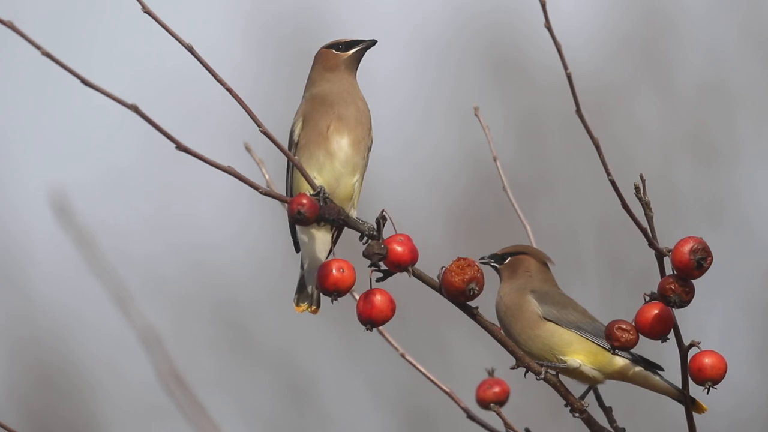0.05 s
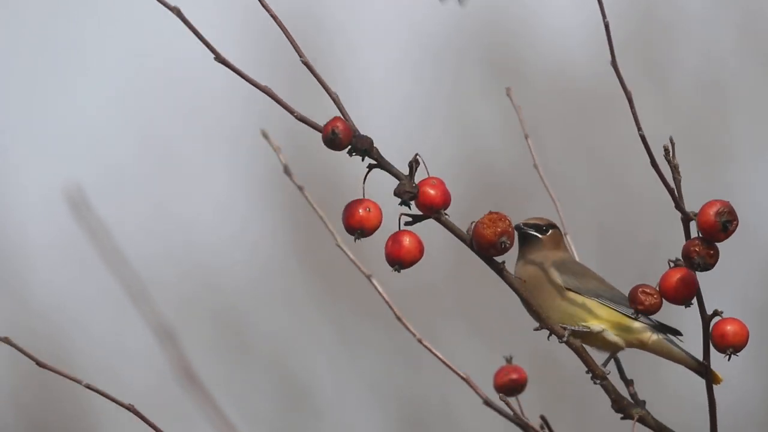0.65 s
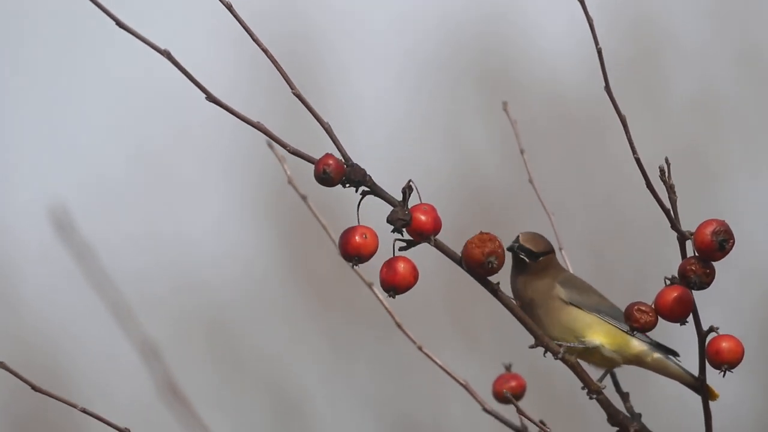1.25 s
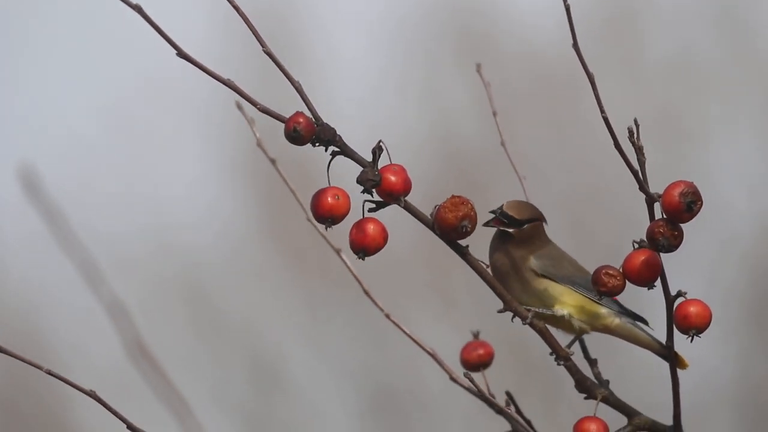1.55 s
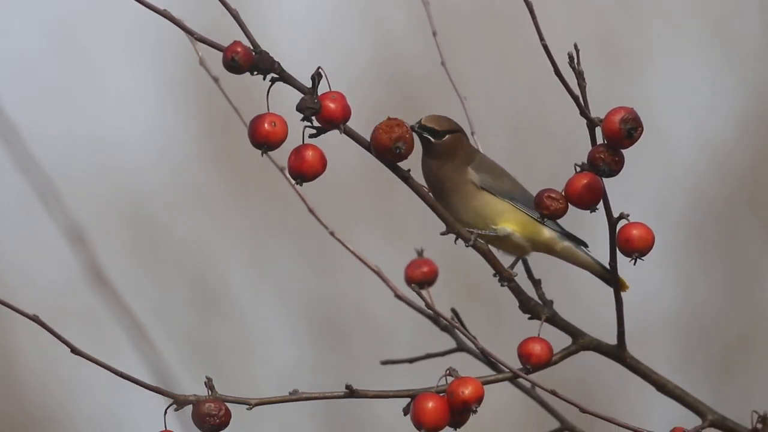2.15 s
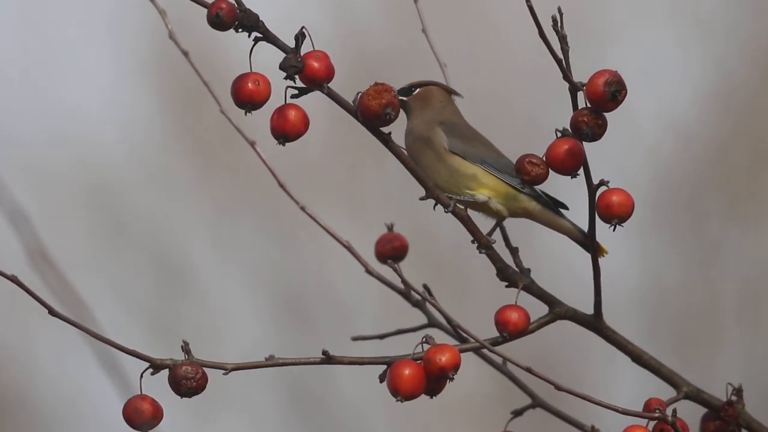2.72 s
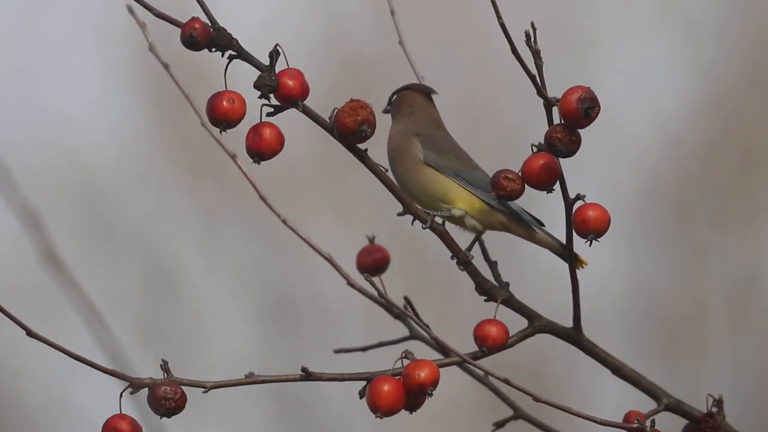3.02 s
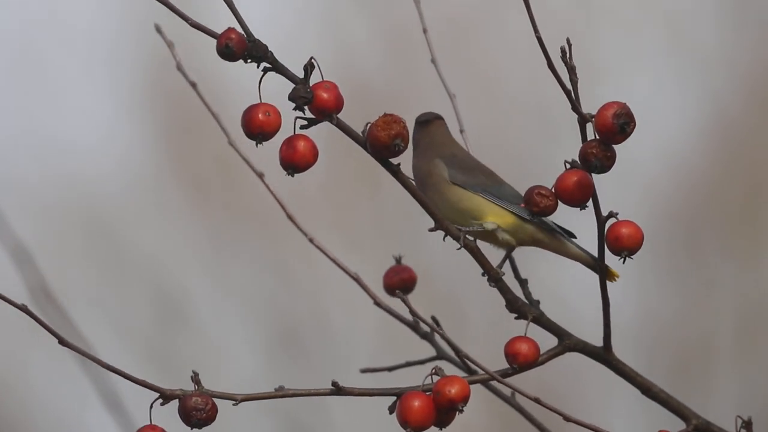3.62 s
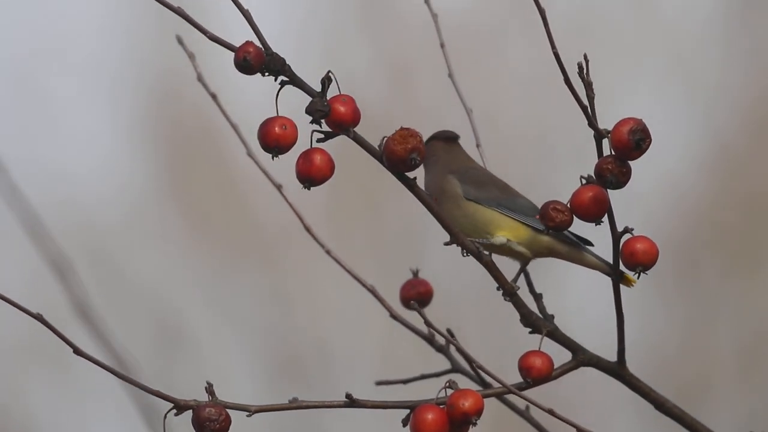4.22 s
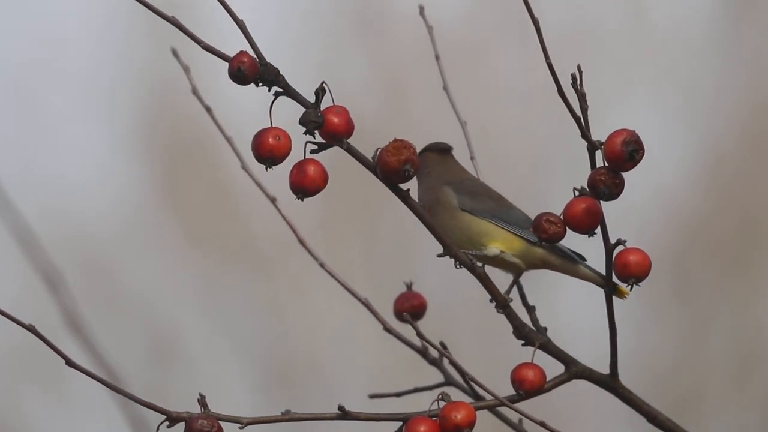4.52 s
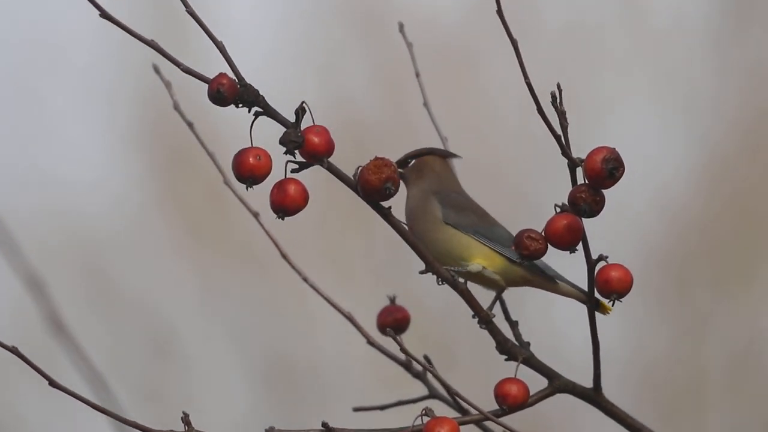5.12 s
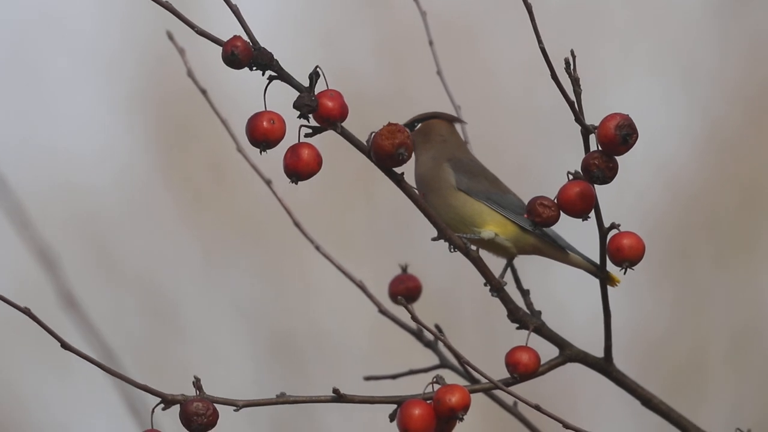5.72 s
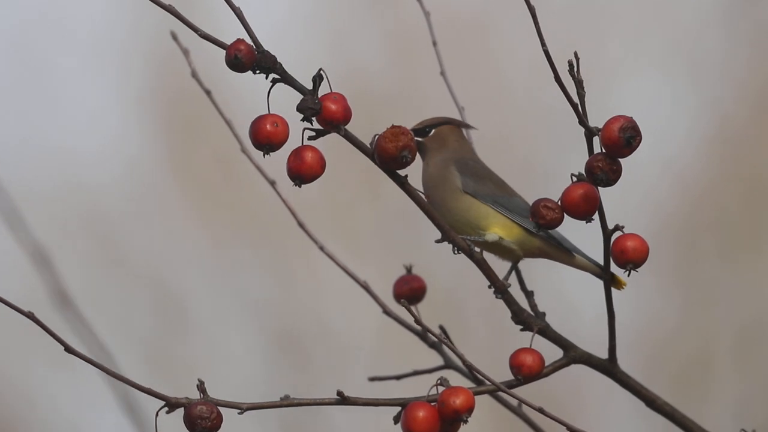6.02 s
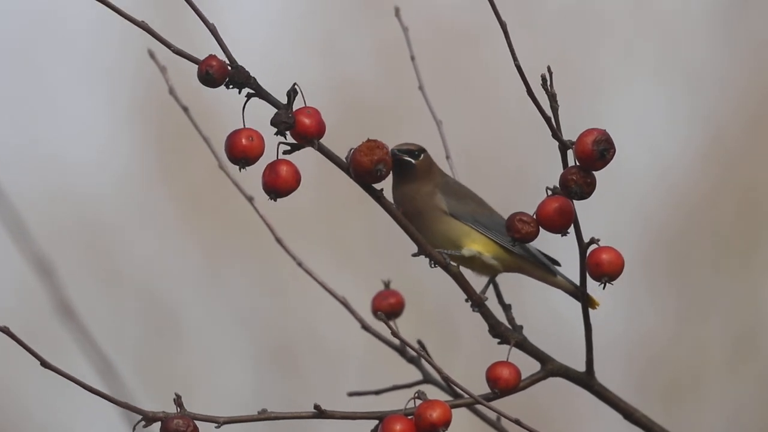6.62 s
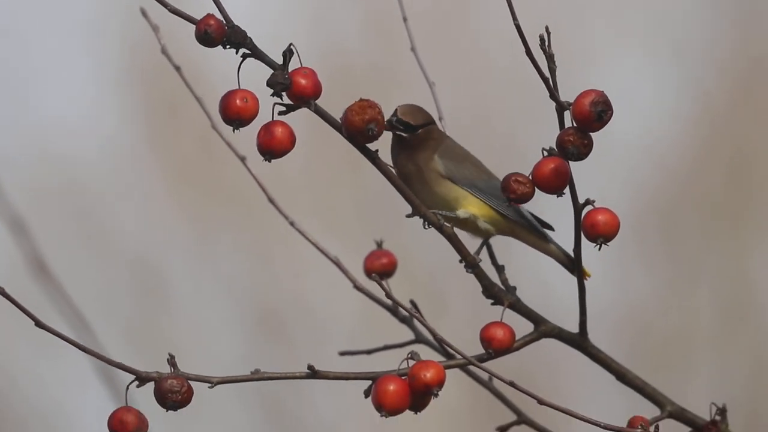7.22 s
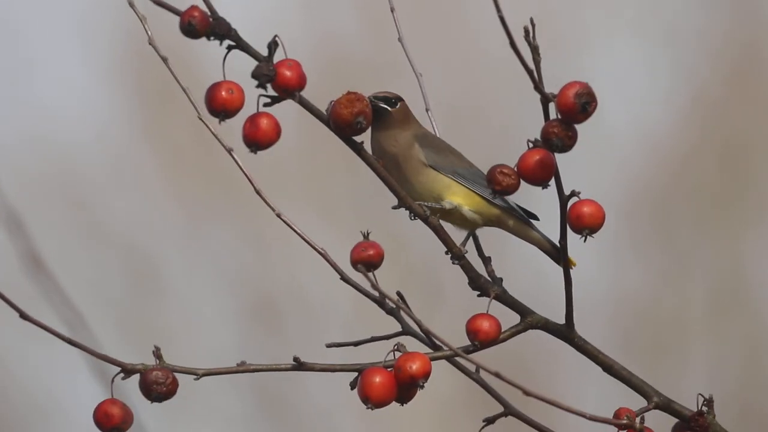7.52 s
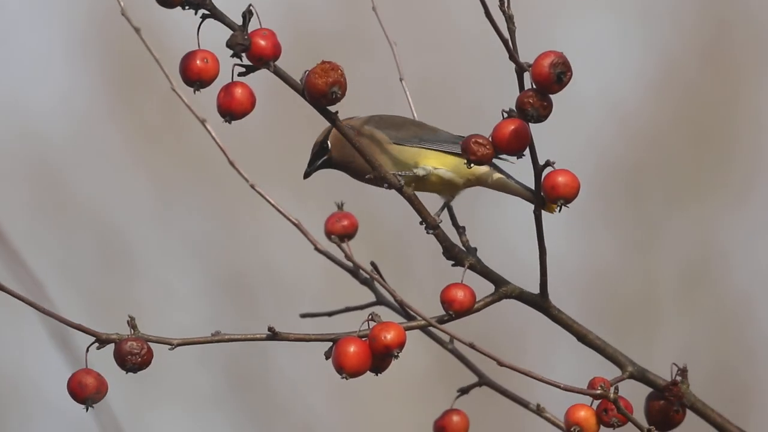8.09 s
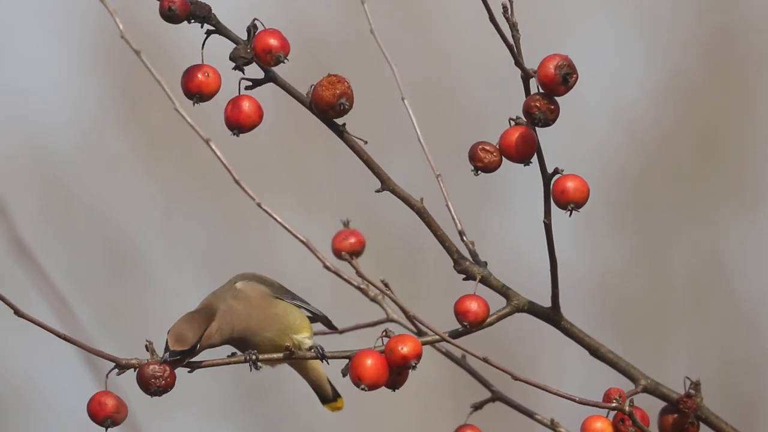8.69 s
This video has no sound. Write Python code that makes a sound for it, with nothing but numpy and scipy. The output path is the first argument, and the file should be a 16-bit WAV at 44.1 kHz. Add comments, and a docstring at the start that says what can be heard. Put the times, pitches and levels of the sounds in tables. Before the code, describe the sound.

A quiet, steady rumble of distant traffic with a faint hiss runs throughout. At about 0.3 seconds a small bird nearby gives a thin, very high whistle and a rapid trill, then another whistle at 0.8. A chip and a quick twitter come at 1.6, fainter paired rising notes from farther away between 1.9 and 2.6, and another twitter at 2.7. From about 4 to 6 seconds light puffs of wind make low, soft bumps on the microphone. Water drops spatter on it from 5.6, and one strikes its housing at 6 with a sharp click, the loudest sound of all. Another strong click comes at 7, followed by a light patter of ticks until 7.6, a small spatter at 7.8 and a further click near 8. Faint high twitters return from 8.3 to the end, with one more soft wind bump.

```python
"""A steady rumble of distant traffic, and almost at once the thin whistles and trills of waxwings.
The birds call from a bare fruit tree, each note a near sine from the syrinx, scattered by the twigs.
Light puffs of wind bump the single microphone. In the second half a few drops spatter
and tick on its housing, making it ring."""
import sys
import numpy as np
from scipy import signal
from scipy.fft import rfft, irfft
from scipy.io import wavfile
from scipy.ndimage import uniform_filter1d

SR = 44100
rng = np.random.default_rng(int(sys.argv[2]) if len(sys.argv) > 2 else 0)


def to_wav(sig):
    """Store sig (one row per channel, or 1-D mono) as 16-bit WAV at the path in sys.argv[1].

    Samples outside -1..1 are clipped; the rate is SR.
    """
    pcm = np.clip(np.atleast_2d(sig), -1, 1) * 32767
    pcm = np.round(pcm).astype(np.int16)
    wavfile.write(sys.argv[1], SR, pcm.T)  # frames by channels


N = 385875
TIME = np.arange(N) / SR


def undb(db):
    """Decibels to gain."""
    return 10 ** (np.asarray(db) / 20)


def unit(x):
    """Scale to rms 1."""
    return x / np.sqrt(np.mean(x ** 2))


def add(out, start_s, x):
    """Mix x into out from the given time."""
    i = max(int(start_s * SR), 0)
    out[i:i + len(x)] += x[:max(len(out) - i, 0)]


def fade(t, t60):
    """Exponential decay, 60 dB down after t60 seconds."""
    return np.exp(-np.log(1000) * t / t60)


def colour(points, hz):
    """Gain at hz of a spectrum given as (frequency [Hz], level [dB])."""
    point_hz, db = np.transpose(points)
    return undb(np.interp(np.log(hz + 1e-9), np.log(point_hz), db))


def noise(points, size):
    """Noise of rms 1 with a given spectrum."""
    white = rfft(rng.standard_normal(size))
    return unit(irfft(white * colour(points, np.fft.rfftfreq(size, 1 / SR)), size))


def wander(rate_hz, size=N):
    """Smooth random drift of rms 1."""
    hold = max(int(SR / rate_hz), 1)
    steps = np.repeat(rng.standard_normal(size // hold + 1), hold)
    return unit(uniform_filter1d(uniform_filter1d(steps, hold), hold)[:size])


# The open air around the tree: (frequency [Hz], level [dB])
AIR_SPECTRUM = [(12, -41), (20, -20), (60, -3), (222, -1), (328, -2), (367, -0.5), (499, -3.5), (542, -3.5),
                (802, -4.5), (923, -3), (2750, -16.5), (5230, -24.5), (8410, -23), (14700, -33),
                (16000, -31)]
# Resonances in the traffic drone: (frequency [Hz], width [Hz], boost [dB])
TRAFFIC_DRONES = [(247, 71, 2), (410, 97, 0), (924, 48, 1.5)]
# The background's slow rise, before the trims: (time [s], traffic level [dB], hiss level [dB])
BACKGROUND_LEVELS = [(0.0, -49.5, -61), (0.41, -49.5, -60.5), (8.75, -47.5, -58.5)]

def distant_traffic(traffic_trim_db=-.5, hiss_trim_db=-1, bass_drift_db=2):
    """Traffic from far off: broad drones and a restless bass, under a smooth high hiss."""
    hz = np.fft.rfftfreq(N, 1 / SR)
    drone_db = sum(db * np.exp(-((hz - centre) / width * 2) ** 2) for centre, width, db in TRAFFIC_DRONES)
    spectrum = rfft(noise(AIR_SPECTRUM, N)) * undb(drone_db)
    bands_hz = [(0, 150), (150, 3500), (3500, SR)]
    bass, body, hiss = (irfft(spectrum * ((hz >= low) & (hz < high)), N) for low, high in bands_hz)
    times, *levels = np.transpose(BACKGROUND_LEVELS)
    traffic_db, hiss_db = (np.interp(TIME, times, db) for db in levels)
    traffic = (body * undb(.2 * wander(8.6)) + bass * undb(bass_drift_db * wander(9) - 1)) / body.std()
    return traffic * undb(traffic_db + traffic_trim_db) + unit(hiss) * undb(hiss_db + hiss_trim_db)


# Single vehicles in the distance: (time [s], length [s], frequency [Hz], width [Hz], level [dB])
VEHICLES = [(.35, 1.2, 800, 450, -61), (1.05, 0.65, 540, 40, -63), (1.851, 0.83, 247.3, 35, -56),
            (4.5, 0.36, 189.7, 35, -56), (7.1, .8, 255, 35, -60)]

def far_vehicles():
    """Each is a wavering hum or rush that rises out of the rumble and sinks back."""
    out = np.zeros(N)
    for start, length, hz, width_hz, db in VEHICLES:
        size = int(length * SR)
        waver = wander(width_hz * 2, size) + 1j * wander(width_hz * 2, size)
        hum = np.real(waver * np.exp(2j * np.pi * hz * TIME[:size]))
        add(out, start, undb(db) * np.hanning(size) * hum)
    return out


# Wind across the microphone: (time [s], length [s], level [dB])
WIND_GUSTS = [(1.2, .14, -55), (2.53, .2, -58), (3.92, 0.11, -47.5), (4.13, .32, -46), (5.4, .7, -59)]
# Its buffeting: (frequency [Hz], level [dB])
BUFFET_SPECTRUM = [(15, -15), (40, -3), (85, 1), (140, -7), (250, -25), (800, -60)]

def wind_gusts():
    """Low turbulence that swells and sinks as a gust crosses the microphone."""
    out = np.zeros(N)
    for start, length, db in WIND_GUSTS:
        size = int(length * SR)
        add(out, start, undb(db) * np.hanning(size) * noise(BUFFET_SPECTRUM, size))
    return out


# Puffs right on the diaphragm: (time [s], level [dB], frequency [Hz])
WIND_BUMPS = [(3.998, -31, 91), (4.248, -33.5, 65), (5.032, -36.5, 85), (5.741, -41, 62), (5.83, -41, 70),
              (5.902, -42, 65.3), (8.53, -40, 123)]

def wind_bumps(rise_cycles=.38, size=4096):
    """Each puff pushes the diaphragm through a swing or two."""
    t, out = TIME[:size], np.zeros(N)
    for start, db, hz in WIND_BUMPS:
        rise = t * hz / rise_cycles
        envelope = rise * np.exp(1 - rise)
        add(out, start, undb(db) * envelope * np.sin(2 * np.pi * hz * t))
    return out


# Drops bursting on the microphone: (time [s], level [dB], t60 [s], splat relative to spray [dB])
BURSTING_DROPS = [(5.616, -49.5, 0.095, -11), (5.786, -40.5, 0.08, 4.5), (5.853, -49, 0.077, -4),
                  (7.785, -49, .06, -10), (7.801, -46, 0.052, -6)]
# Their fine spray: (frequency [Hz], level [dB])
SPRAY_SPECTRUM = [(1000, -33), (4000, -7), (7500, 5.5), (10500, -0.5), (14000, -7), (17000, -36)]
# Their dull splat: (frequency [Hz], level [dB])
SPLAT_SPECTRUM = [(600, -30), (1500, -4), (2600, -7), (3500, 0.5), (5000, -14), (16000, -35)]

def drop_spatters(rise_s=.0003, size=4096):
    """A drop bursts in a splat and a fizz of spray, gone within a tenth of a second."""
    t, out = TIME[:size], np.zeros(N)
    for start, db, t60, splat_db in BURSTING_DROPS:
        burst = noise(SPRAY_SPECTRUM, size) + undb(splat_db) * noise(SPLAT_SPECTRUM, size)
        add(out, start, undb(db) * burst * fade(t, t60) * (1 - np.exp(-t / rise_s)))
    return out


# A drop's contact with the housing: (frequency [Hz], level [dB])
CONTACT_SPECTRUM = [(200, -41), (700, -11), (1300, 1.5), (2100, -5), (3500, 2), (4700, -2), (6000, -0.5),
                    (7700, 2), (10000, -7), (12500, -21), (14300, -19), (17000, -25)]

def contact_crack(size):
    """The impact itself: a very short minimum-phase pulse, its energy packed at the start."""
    cepstrum = irfft(np.log(colour(CONTACT_SPECTRUM, np.fft.rfftfreq(size, 1 / SR))))
    lag = np.arange(size)
    causal = (lag > 0) & (lag < size // 2)
    crack = irfft(np.exp(rfft(2 * cepstrum * causal)))
    return crack / np.abs(crack).max()


# Modes of the microphone housing: (frequency [Hz], level [dB], t60 [s])
HOUSING_MODES = [(1830, -2, 0.011), (2120, -10, 0.012), (2580, -5, 0.0099), (3240, -12, 0.011),
                 (3600, -6, 0.011), (4150, -9, .012), (6540, -22, .005), (7500, 15, 0.0045),
                 (9100, -5, .006), (10150, 10.5, 0.0048), (11500, -1, 0.0026), (14550, -15, .003)]

def housing_ring(size):
    """The struck housing rings for a few milliseconds."""
    t = TIME[:size]
    ring = sum(undb(db) * fade(t, t60) * np.sin(2 * np.pi * hz * t) for hz, db, t60 in HOUSING_MODES)
    return ring / np.abs(ring).max()


# Drops on the housing: (time [s], level [dB], ring share [0-1], cut-off [Hz], relative graze [dB])
TICKING_DROPS = [(5.9869, 0.3, .98, 15500, -11), (6.0044, -22.5, .8, 3500, 3),
                 (6.9165, -34, .2, 14000, -30), (6.9261, -26, .6, 11000, -20),
                 (6.9949, -10.5, 0, 17000, -30), (7.2513, -36, .7, 12000, -20),
                 (7.4024, -24, .2, 13000, -10), (7.4220, -26.5, .6, 15000, -10),
                 (7.4333, -29, 0, 10000, -20), (7.4535, -24.5, 0.4, 14000, -22),
                 (7.4586, -20.5, .1, 12000, 4), (7.5004, -30, .2, 12000, -8),
                 (7.9499, -15.5, 0.16, 13000, -4)]

def drop_ticks(patter_start_s=6.88, patter_length_s=.75, patter_count=30, graze_lead_s=.0009, size=1024):
    """Each drop grazes the housing, then lands and rings it; soft ones wake only its low modes."""
    crack, ring = contact_crack(size), housing_ring(size)
    faint_patter = [(patter_start_s + patter_length_s * when, -46 + 10 * force ** 2, share, 16000, -15)
                    for when, force, share in rng.random((patter_count, 3))]
    out = np.zeros(N)
    for start, db, ring_share, cutoff_hz, graze_db in list(TICKING_DROPS) + faint_patter:
        softness = signal.butter(4, cutoff_hz, fs=SR, output="sos")
        tick = signal.sosfilt(softness, (1 - ring_share) * crack + ring_share * ring)
        tick = undb(db) * tick / np.abs(tick).max()
        add(out, start - graze_lead_s, undb(graze_db) * tick)
        add(out, start, tick)
    bass_cut = signal.butter(2, 850, "high", fs=SR, output="sos")  # so small a part gives no bass
    return signal.sosfilt(bass_cut, out)


def syrinx_note(length, start_hz, top_hz, end_hz, crest, bend, edge=.2, overtone_db=-28):
    """A near sine that climbs to its top pitch, reached at the share crest of its length, then drops."""
    progress = np.linspace(0, 1, int(length * SR))
    climb_left = np.maximum(1 - progress / crest, 0)
    drop = np.maximum((progress - crest) / (1 - crest), 0)
    hz = top_hz - (top_hz - start_hz) * climb_left ** bend - (top_hz - end_hz) * drop ** 2
    phase = 2 * np.pi * np.cumsum(hz) / SR
    ramp_share = min(edge, .0061 / length)  # opens and closes in at most 6.1 ms
    opening = np.minimum(np.minimum(progress, 1 - progress) / ramp_share, 1)
    return np.sin(np.pi / 2 * opening) * (np.sin(phase) + undb(overtone_db) * np.sin(2 * phase))


def twig_echoes(call, wet_db, t60, first_s, count, last_s=.23):
    """The direct call, followed by many faint echoes from the branches around the bird."""
    lags = rng.uniform(first_s, last_s, count)
    response = np.zeros(SR)
    response[(lags * SR).astype(int)] = rng.standard_normal(count) * fade(lags, t60)
    return call + undb(wet_db) * signal.fftconvolve(call, response / np.linalg.norm(response))[:N]


# Paired calls from deeper in the tree: (time [s], long top [Hz], short top [Hz], level [dB])
RISING_PAIRS = [(1.903, 9850, 8350, -62), (2.112, 8740, 8130, -55), (2.309, 8400, 7850, -55),
                (2.499, 7980, 7600, -53)]

def far_waxwing(start_share=.84, snap_hz=1700, short_delay_s=.083, crescendo_db=4, rasp_db=2.5, trim_db=1):
    """A long hooked sweep, then a short, straighter, louder one; each grows and snaps off downward."""
    def sweep(length, top_hz, crest, bend):
        note = syrinx_note(length, start_share * top_hz, top_hz, top_hz - snap_hz, crest, bend, edge=.12)
        return note * undb(crescendo_db * np.linspace(-.5, .5, len(note)))

    out = np.zeros(N)
    for start, long_hz, short_hz, db in RISING_PAIRS:
        add(out, start, undb(db) * sweep(.054, long_hz, crest=.84, bend=1.8))
        add(out, start + short_delay_s, undb(db + 4) * sweep(.034, short_hz, crest=.8, bend=1.15))
    calls = out * undb(trim_db + rasp_db * wander(400))
    return twig_echoes(calls, wet_db=-6, t60=.3, first_s=.012, count=300)


# Whistles from the near branches: (time [s], length [s], start [Hz], top [Hz], level [dB])
THIN_WHISTLES = [(0.319, .039, 6230, 6520, -47), (0.762, 0.18, 5760, 6570, -53),
                 (1.93, .038, 7400, 7650, -60.5), (7.93, .11, 6830, 6840, -68)]

def thin_whistles(sag_hz=120, quaver_db=2, fade_db_per_s=25):
    """Each starts firmly, climbs, levels off and quavers as it fades."""
    out = np.zeros(N)
    for start, length, start_hz, top_hz, db in THIN_WHISTLES:
        end_hz = top_hz - sag_hz
        note = syrinx_note(length, start_hz, top_hz, end_hz, crest=.78, bend=2.1, edge=.15, overtone_db=-22)
        level_db = db - fade_db_per_s * TIME[:len(note)] + quaver_db * wander(92, len(note))
        add(out, start, note * undb(level_db))
    return out


def chip(start_s=1.633, level_db=-50):
    """One sharp note that snaps downward, just ahead of the first twitter."""
    out = np.zeros(N)
    note = syrinx_note(.008, start_hz=7200, top_hz=7400, end_hz=4300, crest=.3, bend=1.63)
    add(out, start_s, undb(level_db) * note)
    return out


# Twitters from the near branches: (time [s], length [s], pip spacing [s], first top [Hz], level [dB])
TWITTER_RUNS = [(1.648, .115, .019, 7560, -48.5), (2.714, .11, 0.021, 7870, -45),
                (8.308, .033, .0165, 7750, -58), (8.36, .075, 0.0182, 8000, -55.5),
                (8.52, .09, .024, 8000, -57)]

def twitters(pip_s=.0125, rise_hz=650, drop_hz=450, scatter_hz=90, sink_hz_per_s=7000, fade_db_per_s=65):
    """Quick runs of small arched pips that sink in pitch and fade."""
    out = np.zeros(N)
    for start, length, spacing, first_hz, db in TWITTER_RUNS:
        for age in spacing * np.arange(round(length / spacing)):
            top_hz = first_hz - sink_hz_per_s * age + scatter_hz * rng.standard_normal()
            pip = syrinx_note(pip_s, top_hz - rise_hz, top_hz, top_hz - drop_hz, crest=.56, bend=1.63)
            add(out, start + age, undb(db - fade_db_per_s * age) * pip)
    return out


# The two arches in each beat of the near trill:
# (delay [s], length [s], start [Hz], top [Hz], end [Hz], crest position [0-1], relative level [dB])
TRILL_ARCHES = [(0, .0125, 7000, 7630, 7130, .63, 3), (.0115, .0215, 6620, 7080, 6000, .5, 2.5)]
# The trill's swell at the microphone: (time [s], level [dB])
TRILL_SWELL = [(0.36, -53), (0.43, -58), (0.47, -47.5), (0.565, -48), (0.6, -58), (0.67, -65)]

def long_trill(start_s=.3625, end_s=.63, beat_s=.0338, scatter_hz=35, uneven_db=1):
    """Two voices alternate on a steady beat, a short high arch and a longer low one, no two alike."""
    out = np.zeros(N)
    for beat in np.arange(start_s, end_s, beat_s):
        for delay, length, start_hz, top_hz, end_hz, crest, db in TRILL_ARCHES:
            pitch, force = rng.standard_normal(2)
            arch = syrinx_note(length, start_hz, top_hz + scatter_hz * pitch, end_hz, crest, bend=1.5)
            add(out, beat + delay, undb(db + uneven_db * force) * arch)
    return out * undb(np.interp(TIME, *np.transpose(TRILL_SWELL)))


def near_waxwings(flutter_db=2.5):
    """The birds nearest the microphone, their calls fluttering in level and scattered by the twigs."""
    song = long_trill() + twitters() + chip() + thin_whistles()
    flutter = undb(flutter_db * wander(300))
    return twig_echoes(song * flutter, wet_db=-14, t60=.28, first_s=.003, count=90)


def scene():
    """One microphone by the tree feeds both channels."""
    traffic = distant_traffic() + far_vehicles()
    birds = near_waxwings() + far_waxwing()
    weather = drop_ticks() + drop_spatters() + wind_bumps() + wind_gusts()
    mono = traffic + weather + birds
    return np.array([mono, mono])


def record(dry, top_hz=15800):
    """The recorder cuts the highest treble steeply."""
    return signal.sosfilt(signal.ellip(10, .1, 70, top_hz, fs=SR, output="sos"), dry)


dry = scene()
out = record(dry)
to_wav(out)
```